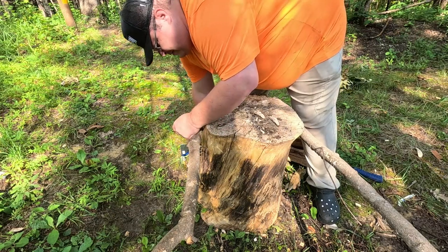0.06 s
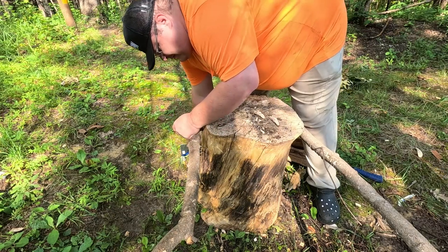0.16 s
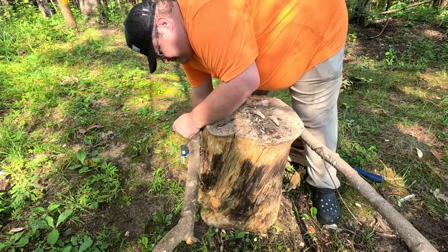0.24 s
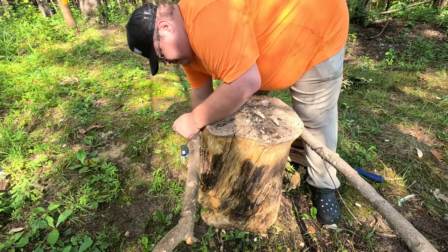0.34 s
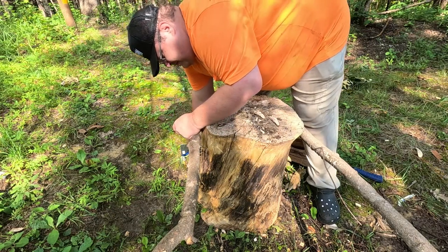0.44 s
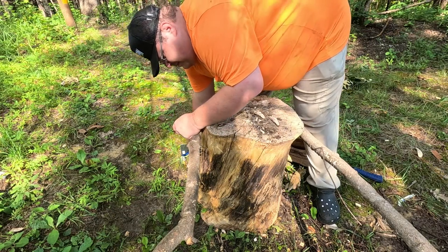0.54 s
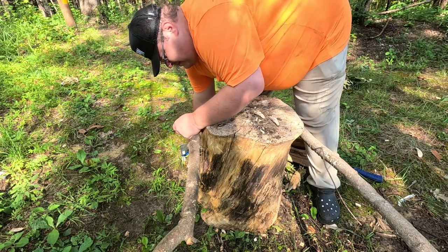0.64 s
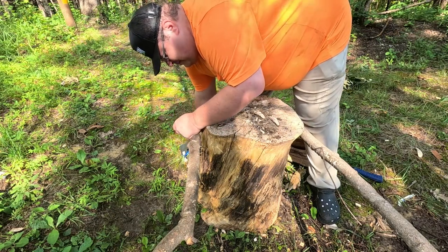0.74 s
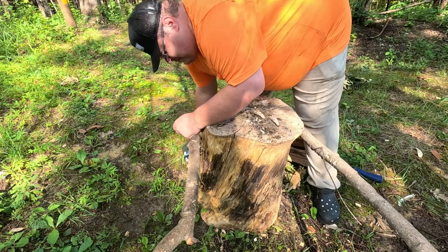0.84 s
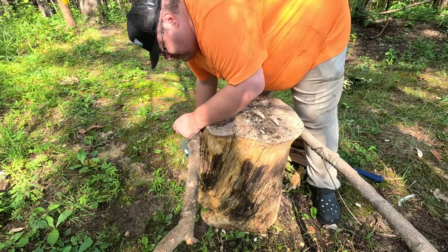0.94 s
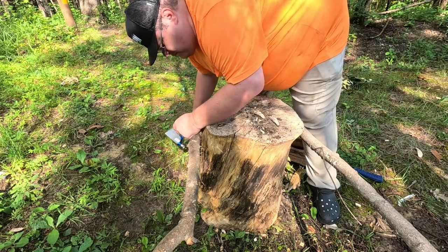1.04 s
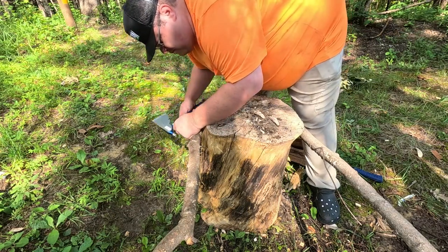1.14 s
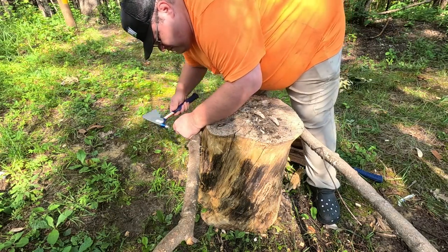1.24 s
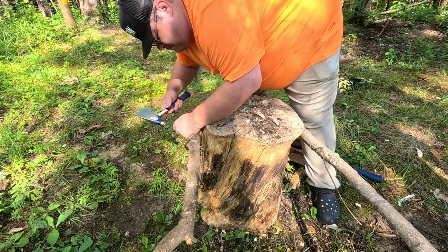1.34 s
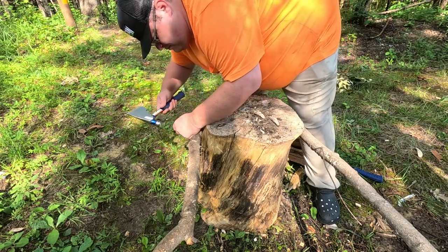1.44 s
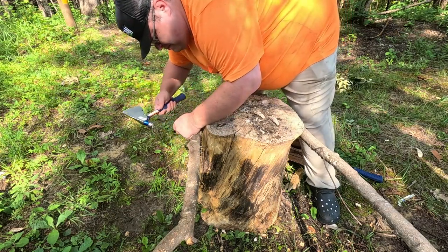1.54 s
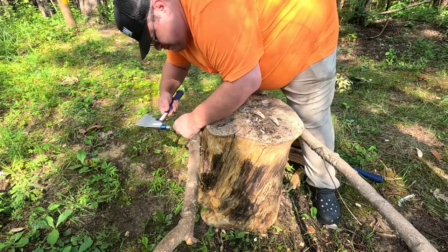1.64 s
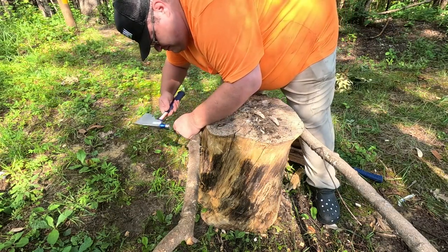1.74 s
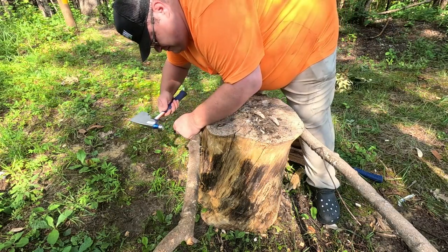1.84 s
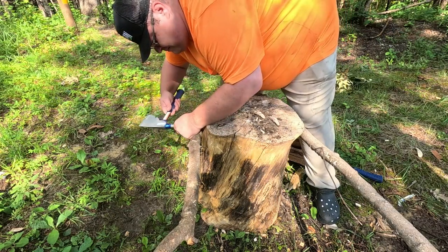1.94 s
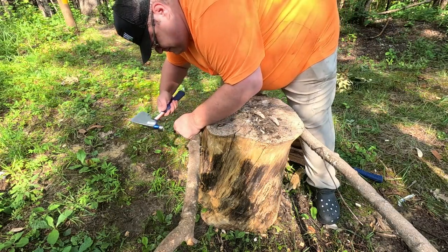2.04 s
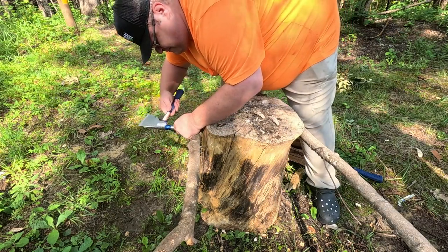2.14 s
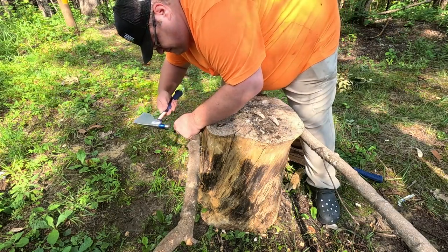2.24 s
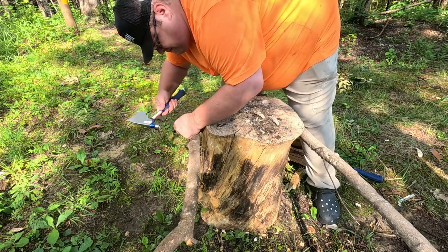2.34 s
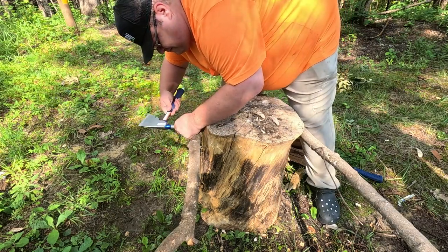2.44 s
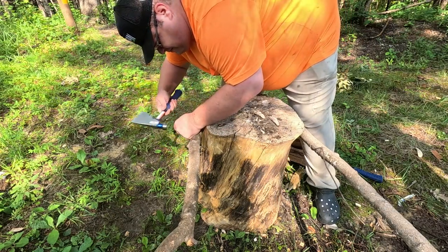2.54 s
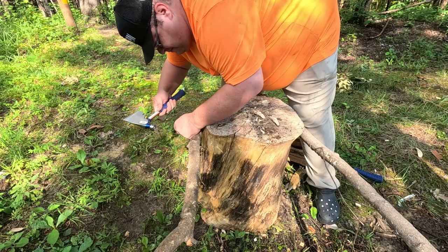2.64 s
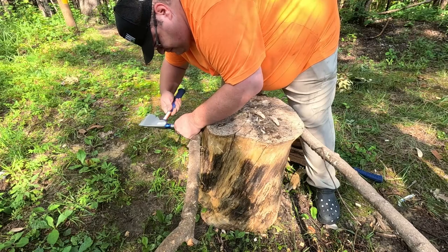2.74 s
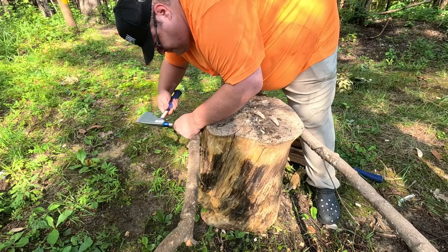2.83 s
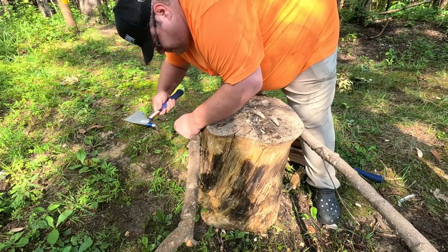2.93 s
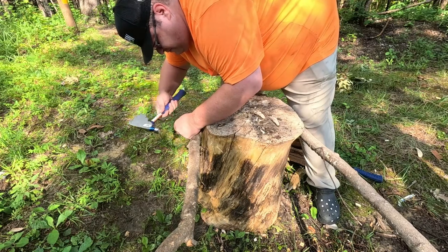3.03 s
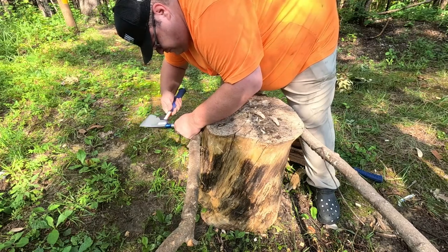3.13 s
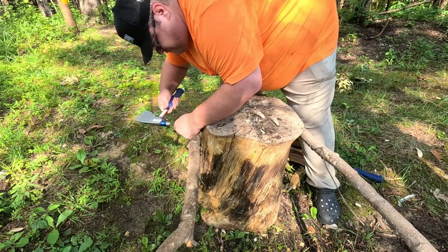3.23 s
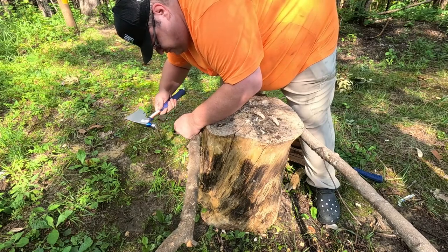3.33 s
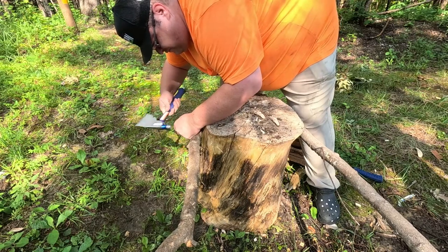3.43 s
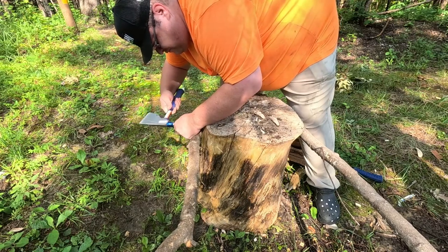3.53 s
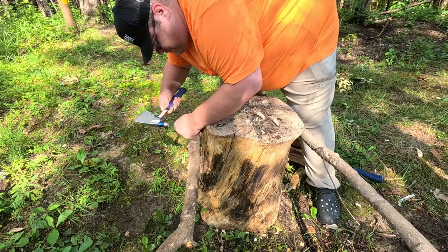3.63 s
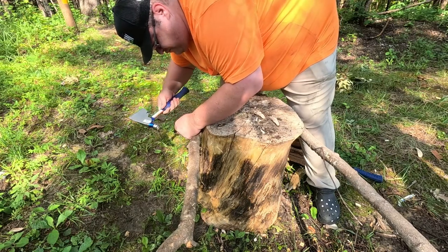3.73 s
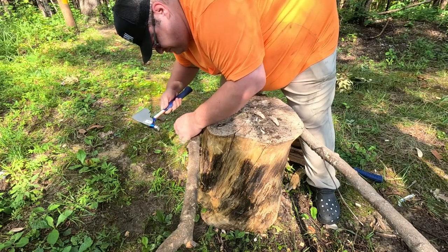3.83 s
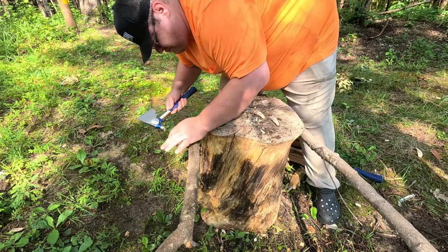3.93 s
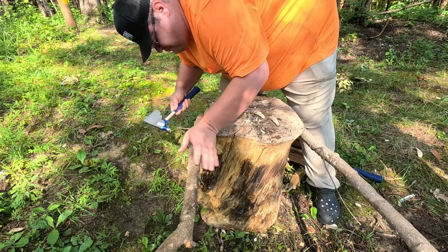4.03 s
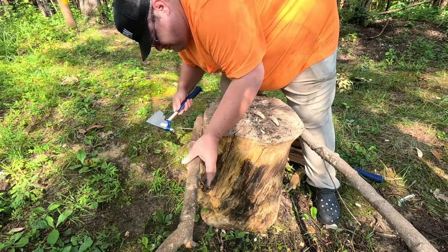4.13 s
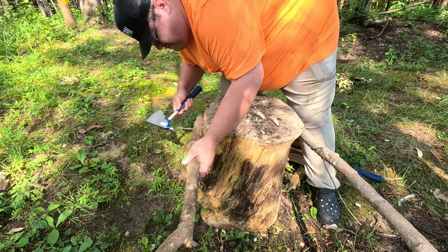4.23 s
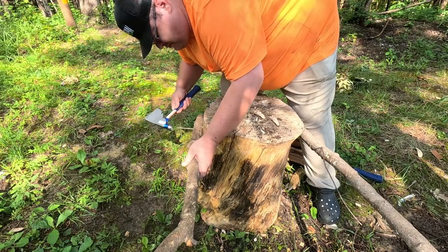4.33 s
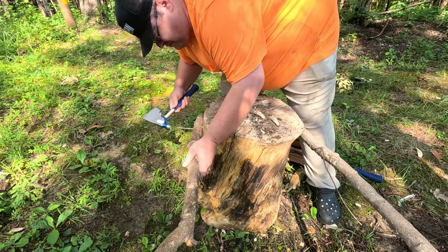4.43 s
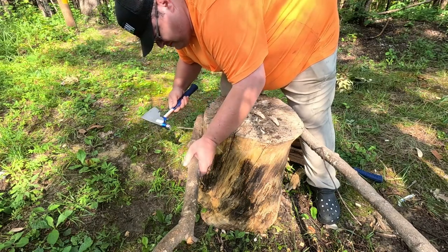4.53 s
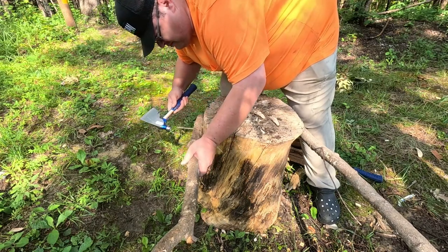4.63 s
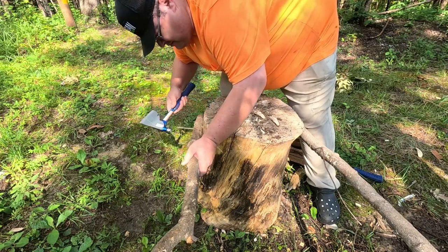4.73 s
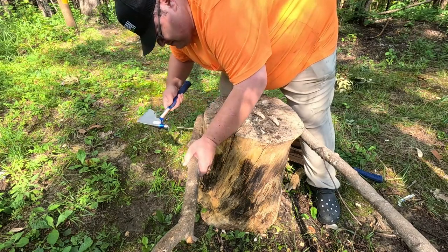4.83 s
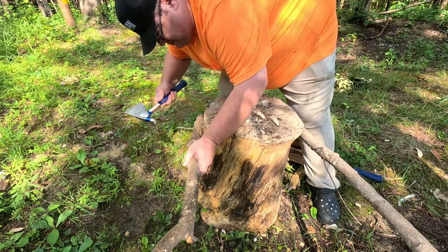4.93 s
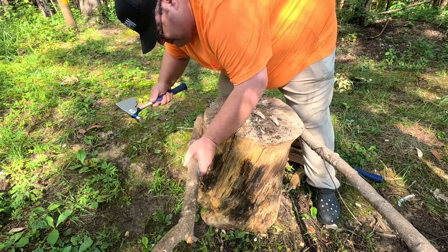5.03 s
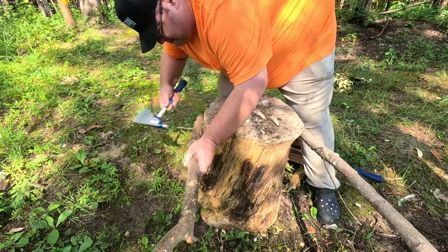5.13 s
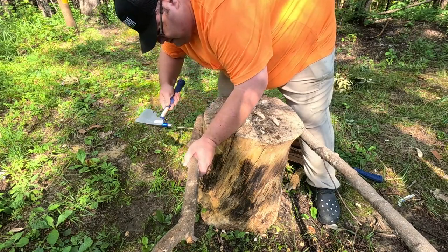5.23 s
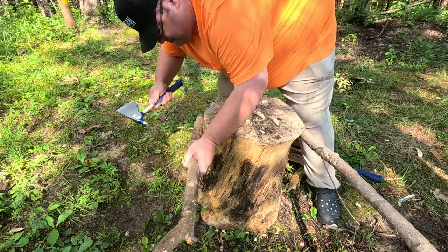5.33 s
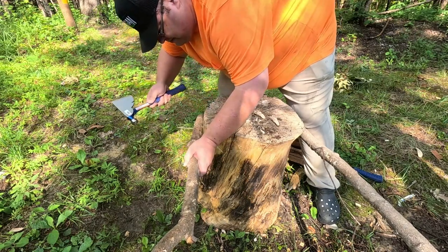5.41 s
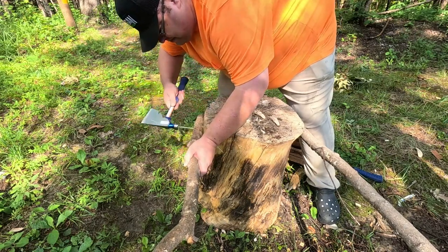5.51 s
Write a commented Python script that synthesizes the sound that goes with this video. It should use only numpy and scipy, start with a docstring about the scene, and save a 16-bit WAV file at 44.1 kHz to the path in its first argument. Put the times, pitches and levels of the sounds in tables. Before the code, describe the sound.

Seven sharp hatchet blows hammer a nail into wood with a steely ring, then light taps and one last blow, amid softly rustling leaves.

```python
"""A clearing in the woods, stereo microphone close to a stump. Leaves rustle all round; far off an engine
climbs, fades and sinks to idle. From 1.8 s the back of a hatchet drives a nail through a branch into the
stump: seven blows, each cracking fibres, knocking the wood and leaving the steel head ringing, while the
trees scatter it back. The background grows quieter, then recovers as light taps follow and a distant bird
chirps twice. At 5.3 s one last blow lands, with the branch damped by the free hand."""
import sys
import numpy as np
from scipy import signal
from scipy.fft import rfft, irfft, next_fast_len
from scipy.io import wavfile

SR = 44100
rng = np.random.default_rng(int(sys.argv[2]) if len(sys.argv) > 2 else 0)


def wav_out(sig):
    """Save sig, one row per channel (or a flat mono array), as 16-bit PCM at SR to the path in sys.argv[1]."""
    wavfile.write(sys.argv[1], SR, np.round(np.clip(np.atleast_2d(sig).T, -1, 1) * 32767).astype(np.int16))


N = 245637
T = np.arange(SR) / SR  # one second of ringing

# leaves, and low air, around the clearing: f/Hz, relative density/dB
LEAF_SPECTRUM = [(240, -52), (400, -2), (607, -7), (730, -5), (814, -9.5), (1110, -0.5), (2430, -2),
                 (2800, -1.5), (3070, -1.5), (5110, -6), (6850, -9.5), (8240, -18), (9920, -21),
                 (13500, -41), (16000, -57)]
AIR_SPECTRUM = [(20, -2), (35, -10), (70, -1), (110, -3.5), (170, -1.5), (280, -5.5), (400, -15.5),
                (700, -51), (1500, -48)]
# how alike the breeze is in the two channels: f/Hz, correlation
BREEZE_LIKENESS = [(60, 1), (130, 0.86), (290, 0.83), (640, 0.68), (1410, 0.66), (3100, 0.57), (6820, 0.8),
                   (15000, 0.19)]
# which side the breeze favours: f/Hz, left over right/dB
BREEZE_BALANCE = [(100, -.5), (700, -1), (1300, 2), (8000, 2.5), (15000, 8)]
# far engine: multiple of its lowest tone, relative level/dB
ENGINE_PARTIALS = [(1, 0), (1.38, -7), (1.63, -15), (1.87, -16)]
# far bird, one row a note: t/s, length/s, start f/Hz, middle f/Hz, end f/Hz, level/dB
BIRD_NOTES = [(4.935, .07, 3000, 2900, 3300, -57), (5.112, .055, 3000, 2750, 2600, -54.5)]
# scatter from the trees: f/Hz, gain/dB
TREE_GAIN = [(100, -47), (600, -18), (1300, -26.5), (2500, -29), (4200, -28.5), (7000, -19.5), (9000, -22),
             (14000, -23)]
# decay of that scatter: f/Hz, t60/s
TREE_DECAY = [(100, 0.21), (1000, 0.29), (3000, 0.68), (7000, 0.29), (14000, 0.46)]
# a blow averaged over all directions: f/Hz, relative density/dB
ALL_ROUND_SPECTRUM = [(100, -20), (700, -5), (1500, -6), (2300, 5.5), (3200, -1), (4400, 0.5),
                      (5600, -14.5), (7000, -5), (9000, -20), (11000, -27), (15000, -42)]
# near reflections from ground and stump: delay/s, gain/dB
NEAR_ECHOES = [(.0089, -45.5), (0.0169, -27)]
# direction of the stump at the microphone: f/Hz, left over right/dB
STUMP_BALANCE = [(100, 0), (300, -1.2), (700, -2), (1300, -1.7), (2400, -.5), (4400, 1), (8000, 3.2),
                 (13000, 2.4)]
# the same direction in phase: f/Hz, lead of left/rad
STUMP_LEAD = [(100, -0.26), (700, -0.079), (2500, -0.55), (6000, -0.35), (12000, -0.73)]
# soft soil under the stump: f/Hz, relative density/dB
SOIL_SPECTRUM = [(20, -10), (45, -4), (75, 0), (120, -2), (170, -10), (300, -26), (1000, -60)]
# branch, nail and stump together: f/Hz, relative level/dB, t60/s
WOOD_MODES = [ (69.4, -47, 0.99), (125.1, -47, 0.72), (145, -30, 0.066), (198, -22.5, 0.057),
              (223, -28.5, 0.28), (287.5, -26.5, 0.23), (427, -52.5, 0.38), (471.6, -37, 0.19),
              (535, -36, 0.065), (608.8, -15, 0.093), (676, -15, 0.042), (734, -33, 0.17),
              (804, -28.5, 0.12), (1046, -24, 0.1), (1180, -23.5, 0.073), (1327, -28.5, 0.07),
              (1556, -12, 0.034), (1682, -21.5, 0.028), (1856, -23, 0.047), (2147, -31, 0.075),
              (2213, -19, 0.045), (2669, -14, 0.029), (2998, -14, 0.036), (3246, -10, 0.023),
              (3713, -18.5, 0.023), (4190, -8, 0.011), (5330, -15.5, 0.015), (7220, -19, 0.022),
              (7680, -23.5, 0.015), (8770, -22, 0.018), ]
# wood fibres crushed by the nail: f/Hz, relative density/dB
FIBRE_SPECTRUM = [(300, -61), (900, -0.5), (1800, 3), (3400, -10.5), (4700, 1.5), (5800, -6.5),
                  (7300, -2.5), (9300, -8), (10300, -9), (11500, -25.5), (14000, -25), (15500, -47)]
# free length of the nail: multiple of its lowest tone, relative level/dB
NAIL_MODES = [(1, 4), (1.66, 5), (2.6, -2)]
# hatchet head: f/Hz, relative level/dB, t60/s
HEAD_MODES = [(4660, -40, .56), (6560, -56, .15), (9528, -56, .34), (11032, -52, .23), (12970, -62, .18),
              (14470, -73, .3)]
# which ring of a blow drives each head mode: 0 main, 1 twisting, 2 upper
HEAD_FAMILY = [0, 0, 1, 2, 2, 1]
# light touches of steel on nail and bark: t/s, gain/dB, thud/dB, brightness/dB
LIGHT_TAPS = [(3.647, -16.5, -26, -8), (4.517, -29.5, -24, -6), (4.544, -38, -24, -7)]
# one row a blow; where it lands sets the ring of nail and head: t/s, force/dB, thud/dB, brightness/dB,
# crack/dB, nail f/Hz, nail gain/dB, main ring/dB, twisting ring/dB, upper ring/dB
HATCHET_BLOWS = [ (1.8136, -7, -8.5, 0, -11.5, 3640, -22, 3, -4, 2),
                 (2.0381, -8, 1, 6, -14, 6700, -8, -6, -13, 2),
                 (2.2915, -4, 1, 1.5, -13, 7900, -10, -8.5, 0, 1),
                 (2.5474, -3, 1.5, 4.5, -15, 3840, -32, -8.5, -16, -17),
                 (2.8651, -2, 0, 1.5, -13.5, 5900, -35, -10, -8, -7),
                 (3.2180, -1, -1, 2, -13.5, 6240, -32, -9, -9, 2),
                 (3.5877, 1, -3.5, -5.5, -14, 3154, -17, -20, 5, -7),
                 (5.293, 0, -1.5, -5.5, -7.5, 2270, -9, -1, 6, -30), ]
# treble roll-off of the microphone: f/Hz, gain/dB
MIC_TREBLE = [(10000, 0), (13500, -0.5), (16000, -11)]


def amp(db):
    """Decibels to gain."""
    return 10 ** (np.asarray(db) / 20)


def unit(x):
    """Scales to rms 1."""
    return x / np.sqrt(np.mean(x ** 2) + 1e-20)


def read(points, hz):
    """Reads a table on a log-frequency axis."""
    f, value = np.transpose(points)
    return np.interp(np.log(hz + 1), np.log(f + 1), value)


def add(mix, s, sound):
    """Mixes a sound in at time s."""
    part = mix[round(s * SR):][:len(sound)]
    part += sound[:len(part)]


def colour(x, db_at, size=2048):
    """Minimum-phase filter whose gain in dB is the function db_at(Hz)."""
    log_gain = np.log(amp(db_at(abs(np.fft.fftfreq(size, 1 / SR)))))
    taps = np.fft.ifft(np.exp(np.conj(signal.hilbert(log_gain)))).real
    return signal.fftconvolve(x, taps[:size // 2])[:len(x)]


def shaped(x, spectrum):
    """Filters by a spectrum table and scales to rms 1."""
    return unit(colour(x, lambda f: read(spectrum, f)))


def drift(hz):
    """Slow random wander of rms 1."""
    f = np.fft.rfftfreq(N, 1 / SR)
    return unit(irfft(rfft(rng.standard_normal(N)) * np.exp(-(f / hz) ** 2), N))


def pair(a, b, likeness):
    """Two channels of a given likeness from two unrelated signals."""
    return np.array([a, likeness * a + np.sqrt(1 - likeness ** 2) * b])


def ring(modes):
    """One decaying sine a mode; neighbouring modes start in opposite directions."""
    hz, db, t60 = np.transpose(modes)[:, :, None]
    sign = np.where(np.arange(len(modes)) % 2, -1, 1)[:, None]
    return sign * amp(db - 60 * T / t60) * np.sin(2 * np.pi * hz * T)


def wash(spectrum, level_db):
    """Noise from all round the microphone: centred in the bass, wider in the treble."""
    hz = np.fft.rfftfreq(N, 1 / SR)
    bins = pair(*rfft(rng.standard_normal((2, N))), read(BREEZE_LIKENESS, hz))
    left = amp(read(BREEZE_BALANCE, hz) / 2)
    bins = bins * amp(read(spectrum, hz)) * np.array([left, 1 / left])
    return amp(level_db) * unit(irfft(bins, N))


def breeze(leaves_db=-54, air_db=-57.5, gust_db=2, dip_at_s=4.15, fall_s=1.16, rise_s=.55):
    """All round: a hiss of leaves over lumpy low air; both grow quieter through the blows, then recover."""
    from_dip = np.arange(N) / SR - dip_at_s
    dip = np.exp(-(from_dip / np.where(from_dip < 0, fall_s, rise_s)) ** 2)
    leaves = wash(LEAF_SPECTRUM, leaves_db - 3 * dip)
    air = wash(AIR_SPECTRUM, air_db - 4 * dip + gust_db * drift(hz=6.6))
    return leaves + air


def engine(start_hz=159.3, climb_hz_per_s=6.2, throttle_off_s=2, sink_s=1, idle_hz=150,
           start_db=-50, fade_at_s=1, fade_db_per_s=14.5, faint_db=-70):
    """Far off: low tones climb, then sink to idle, wavering and fading on their way through the woods."""
    t = np.arange(N) / SR
    driven_hz = start_hz + climb_hz_per_s * np.minimum(t, throttle_off_s)
    hz = idle_hz + (driven_hz - idle_hz) * np.exp(-np.maximum(t - throttle_off_s, 0) / sink_s)
    level_db = np.maximum(start_db - fade_db_per_s * np.maximum(t - fade_at_s, 0), faint_db)
    cycles = np.cumsum(hz * (1 + .003 * drift(hz=6))) / SR
    return sum(amp(level_db + db + 1.4 * drift(hz=6)) * np.sin(2 * np.pi * multiple * cycles)
               for multiple, db in ENGINE_PARTIALS)


def bird():
    """In the distance: short gliding whistles."""
    song = np.zeros(N)
    for s, length_s, *glide_hz, db in BIRD_NOTES:
        progress = np.linspace(0, 1, round(length_s * SR))
        hz = np.interp(progress, [0, .5, 1], glide_hz)
        whistle = np.sin(2 * np.pi * np.cumsum(hz) / SR)
        add(song, s, amp(db) * np.sin(np.pi * progress) * whistle)
    return song


def trees(blow, onset_s=0.048, likeness=0.65, own_db=-5, steel_db=-23):
    """Many faint echoes from trunks and foliage, swelling as the sound reaches the clearing's edge."""
    # each tree hears the blow from another side, which evens out its resonances
    all_round = shaped(signal.unit_impulse(len(blow)), ALL_ROUND_SPECTRUM)
    # the flat cheeks of the head throw its ring sideways into the woods
    sideways = unit(ring(HEAD_MODES).sum(0))
    thrown = amp(own_db) * blow + np.std(blow) * (all_round + amp(steel_db) * sideways)
    scattered = colour(thrown, lambda f: read(TREE_GAIN, f))
    noise = pair(*rng.standard_normal((2, SR)), likeness)
    hz, t, bins = signal.stft(noise, SR, nperseg=256)
    decay = amp(-60 * t / read(TREE_DECAY, hz)[:, None])
    swell = 1 - np.exp(-(T / onset_s) ** 2)
    tail = signal.istft(bins * decay, SR, nperseg=256)[1][:, :SR] * swell
    return signal.fftconvolve(scattered[None], tail / np.linalg.norm(tail[0]), axes=1)


def near_reflections(sound):
    """A sound and its bounces off ground and stump, which shift a little as the hatchet moves."""
    heard = sound.copy()
    for delay_s, db in NEAR_ECHOES:
        add(heard, delay_s * rng.uniform(.93, 1.07), amp(db) * sound)
    return heard


def from_stump(sound):
    """The stump's direction, as level and phase differences between the two microphone ports."""
    size = next_fast_len(N + SR)
    hz = np.fft.rfftfreq(size, 1 / SR)
    left = amp(read(STUMP_BALANCE, hz) / 2) * np.exp(1j * read(STUMP_LEAD, hz) / 2)
    return irfft(rfft(sound, size) * np.array([left, 1 / left]), size)[:, :N]


def shudder(gain_db=-47, rise_s=0.0095, t60_s=0.88):
    """The stump rocks on the soft soil."""
    rumble = shaped(rng.standard_normal(SR), SOIL_SPECTRUM)
    return rumble * amp(gain_db - 60 * T / t60_s) * (1 - np.exp(-T / rise_s))


def contact(rise_s=0.0006):
    """Vibration builds up while steel and nail touch."""
    return 1 - np.exp(-T / rise_s)


def nail(lowest_hz, t60_cycles=50):
    """The free length of the nail clinks, quickly damped by the wood."""
    tones = [(multiple * lowest_hz, db) for multiple, db in NAIL_MODES]
    modes = [(hz, db, t60_cycles / hz) for hz, db in tones if hz < 11000]
    return ring(modes).sum(0) * contact()


def struck_wood(gripped, uneven_db=2, detune=.012, detune_above_hz=1500):
    """The wood rings; each blow lands a little differently, which shifts the high modes most."""
    hz, db, t60 = np.transpose(WOOD_MODES)
    louder, higher = rng.standard_normal((2, len(WOOD_MODES)))
    sensitivity = hz / (hz + detune_above_hz)
    pitch, ringing = (0.99, 0.86) if gripped else (1, 1)  # a hand weighs the branch down and damps it
    hz = hz * pitch * (1 + detune * sensitivity * higher)
    db = db + uneven_db * sensitivity * louder
    return ring(np.transpose([hz, db, t60 * ringing])).sum(0)


def knock(thud_db, bright_db, crack_db, gripped, crack_s=0.0037, thud_hz=900, bright_hz=5500):
    """Ringing wood and a few milliseconds of crushing fibres, tilted dull or bright."""
    def tilt_db(f):
        return thud_db / (1 + (f / thud_hz) ** 2) + bright_db * f ** 2 / (f ** 2 + bright_hz ** 2)

    fibres = shaped(rng.standard_normal(SR), FIBRE_SPECTRUM)
    crack = amp(crack_db) * fibres * np.exp(-T / crack_s)
    return colour((struck_wood(gripped) + crack) * contact(), tilt_db)


def hatchet(grip_from_s=4.1, tap_crack_db=-15):
    """Close up, as (t/s, sound): blows that sound wood, nail and head together, then the light taps."""
    for s, force_db, thud_db, bright_db, crack_db, nail_hz, nail_db, *rings_db in HATCHET_BLOWS:
        impact = knock(thud_db, bright_db, crack_db, gripped=s > grip_from_s)
        wood = amp(force_db) * (impact + amp(thud_db) * shudder())
        clink = amp(nail_db) * nail(nail_hz)
        head = amp(rings_db)[HEAD_FAMILY] @ ring(HEAD_MODES)
        yield s, near_reflections(wood + clink) + head
    for s, gain_db, thud_db, bright_db in LIGHT_TAPS:
        yield s, amp(gain_db) * knock(thud_db, bright_db, tap_crack_db, gripped=s > grip_from_s)


def scene():
    """At the microphone: the hatchet close by, its echo from the trees and the woods behind."""
    direct, echo = np.zeros(N), np.zeros((2, N))
    for s, sound in hatchet():
        add(direct, s, sound)
        for channel, tail in zip(echo, trees(sound)):
            add(channel, s, tail)
    return from_stump(direct + echo) + breeze() + engine() + bird()


def record(dry):
    """The recorder rounds off peaks near full scale; its treble falls away toward the band limit."""
    rounded = dry / (1 + dry ** 8) ** (1 / 8)
    dulled = np.array([colour(channel, lambda f: read(MIC_TREBLE, f)) for channel in rounded])
    band_limit = signal.firwin(255, cutoff=16200, window=("kaiser", 9), fs=SR)
    return signal.oaconvolve(dulled, band_limit[None], "same")


dry = scene()
out = record(dry)
wav_out(out)
```